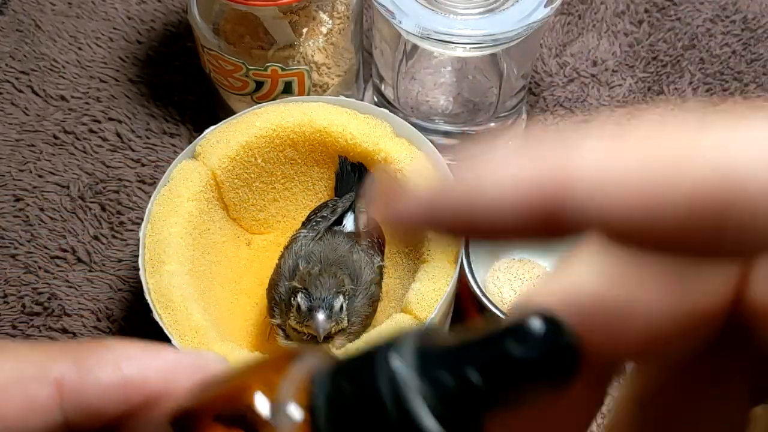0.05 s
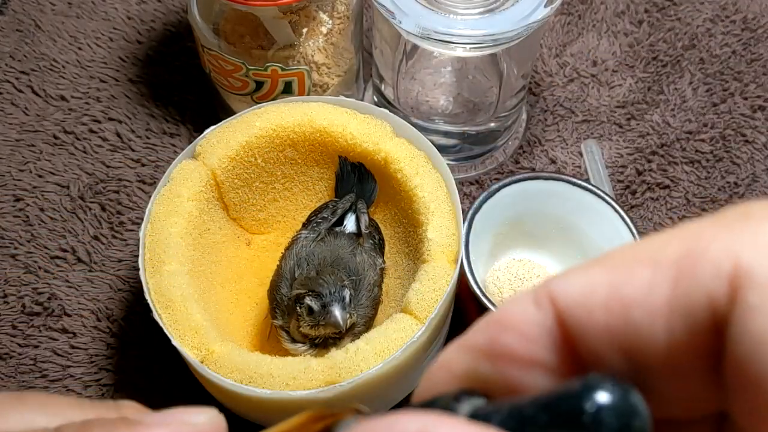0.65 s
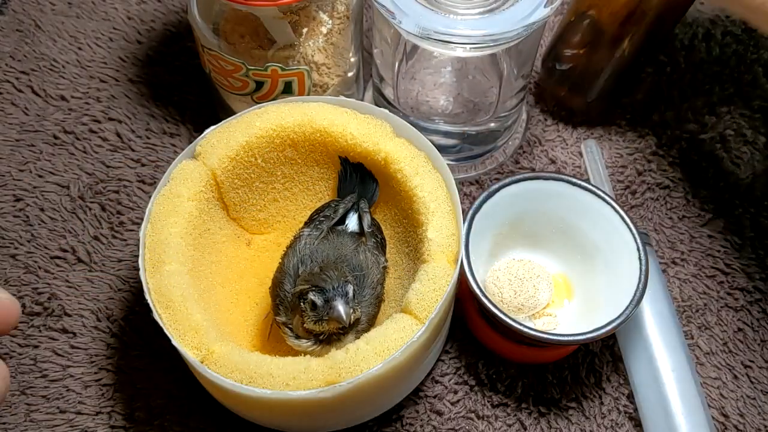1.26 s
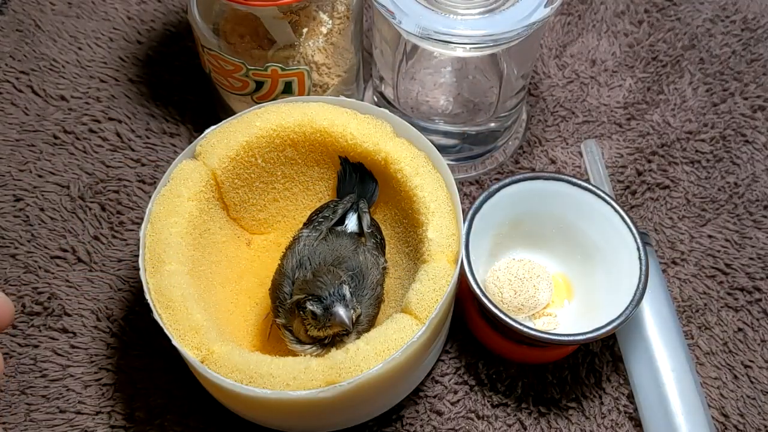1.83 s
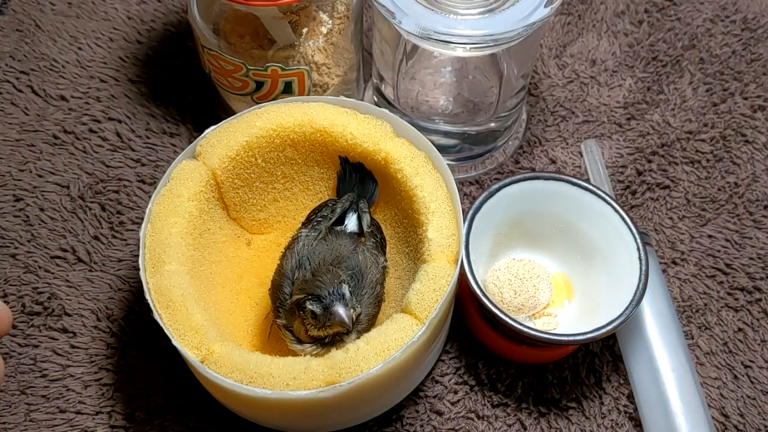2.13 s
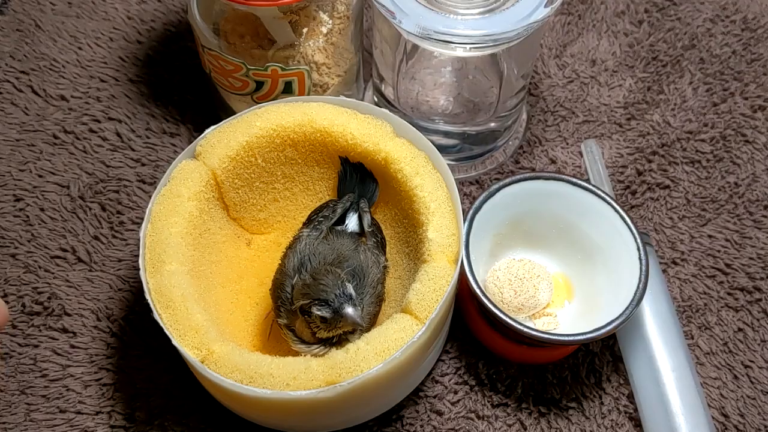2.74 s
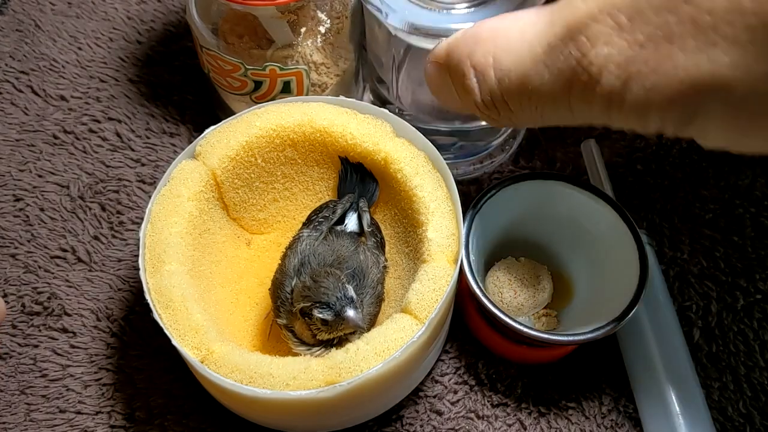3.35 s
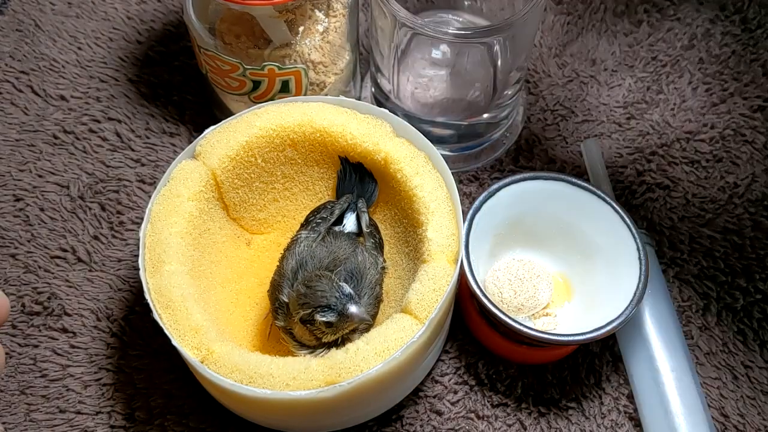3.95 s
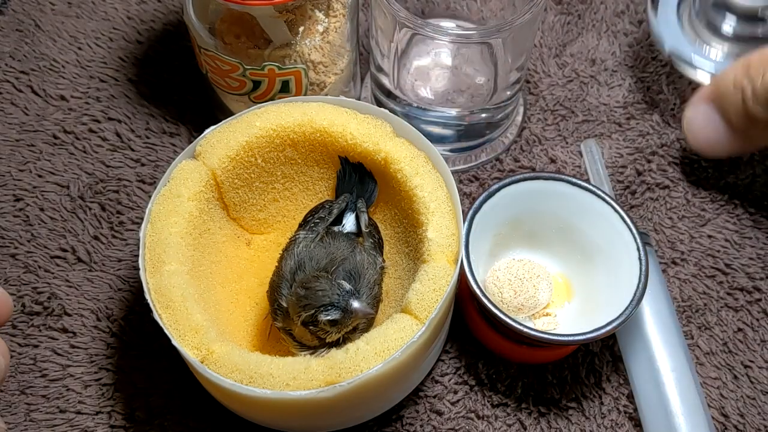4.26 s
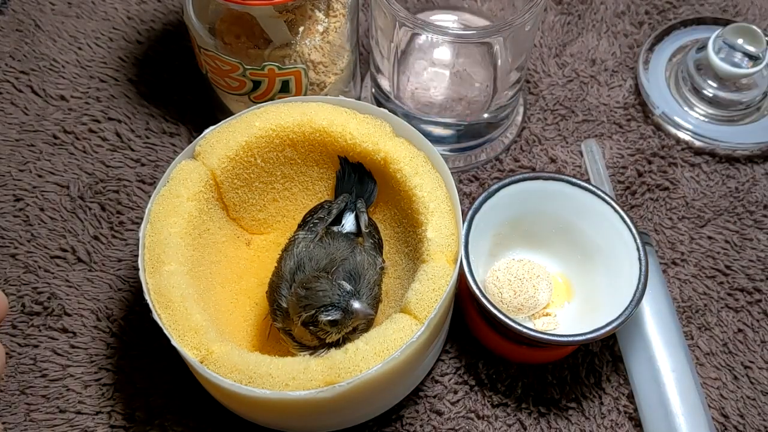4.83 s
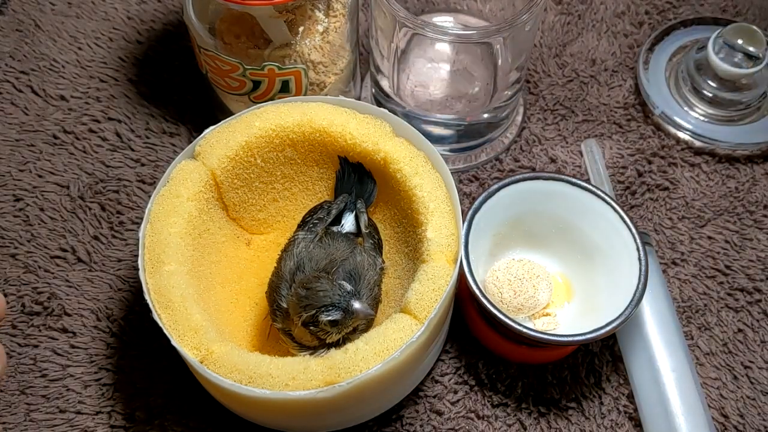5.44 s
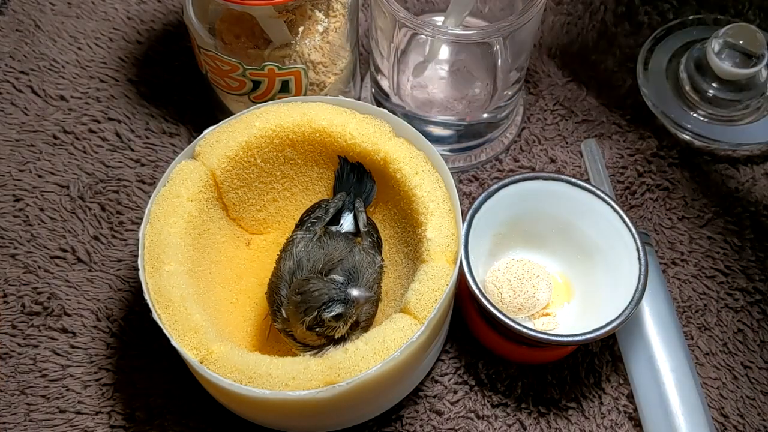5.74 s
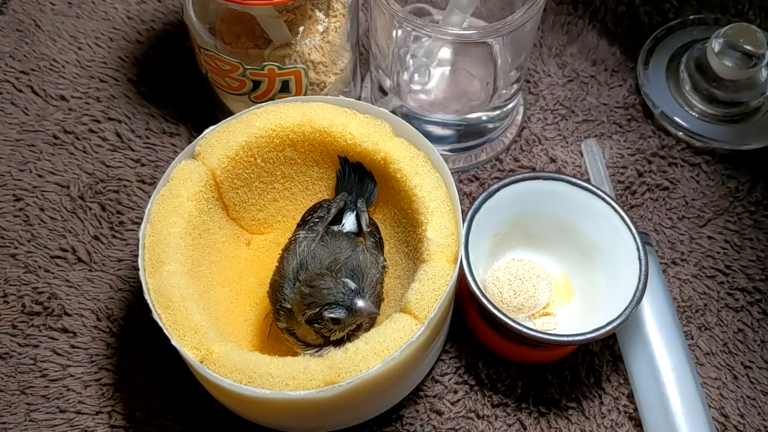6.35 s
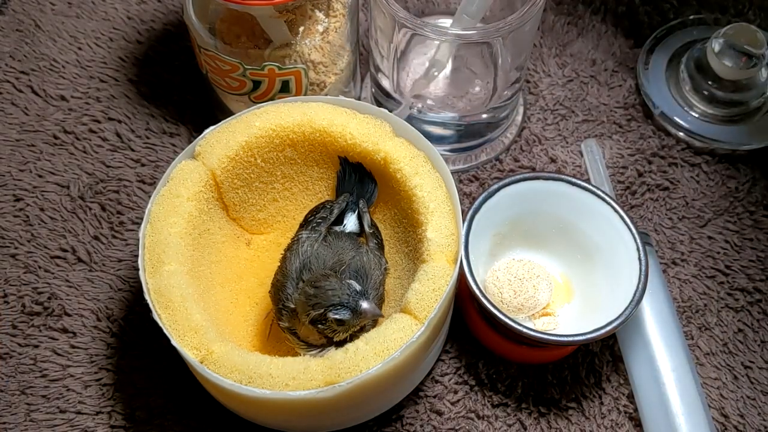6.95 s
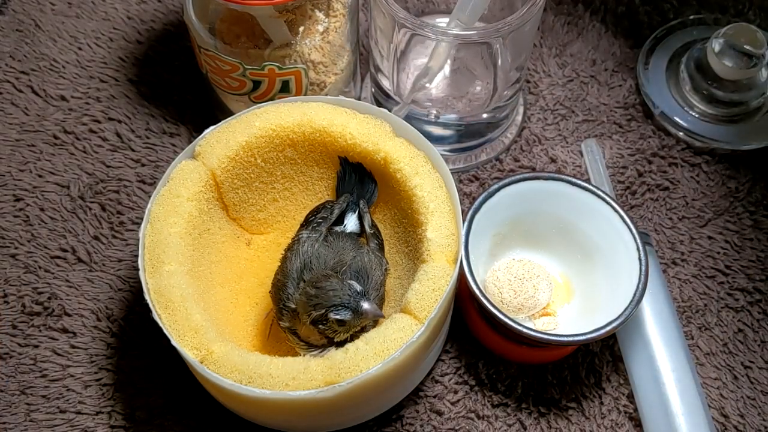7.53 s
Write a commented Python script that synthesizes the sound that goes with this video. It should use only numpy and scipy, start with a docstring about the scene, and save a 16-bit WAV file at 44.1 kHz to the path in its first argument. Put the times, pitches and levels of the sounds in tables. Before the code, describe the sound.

Two finches call almost without pause in a small room, a little left of the microphone, one closer than the other. Rapid trills and twittering overlap at first, then give way to louder, separate chirps that slide down in pitch. The walls blur the calls into a bright wash. A hand moving feeding things on a towel adds a few soft bumps and ticks over faint room noise.

```python
"""Two finches in a small room

Two finches chirp and trill without pause, a little left of the microphone. Each syllable is one
gliding whistle, repeated in phrases; the hard walls smear the fast glides into a bright wash.
A hand moves feeding things on a towel with a few soft bumps, over faint room noise."""
import sys
import numpy as np
from scipy import signal
from scipy.fft import rfft, irfft, next_fast_len
from scipy.io import wavfile
from scipy.ndimage import uniform_filter1d

SR = 44100
rng = np.random.default_rng(int(sys.argv[2]) if len(sys.argv) > 2 else 0)


def output_pcm(signal):
    """Save a mono or channel-first signal as 16-bit PCM at the path in sys.argv[1].

    Samples are clipped to [-1, 1] before scaling.
    """
    pcm = np.clip(np.atleast_2d(signal).T, -1, 1) * 32767
    wavfile.write(sys.argv[1], SR, np.round(pcm).astype(np.int16))


N = 334701


def undb(db):
    """Turn decibels into a factor to multiply a sound by."""
    return 10 ** (np.asarray(db) / 20)


def unit(x):
    """Scale a sound so that its average power is 1."""
    return x / np.sqrt(np.mean(x ** 2))


def pan(x, left_db):
    """Make the left channel louder than the right by left_db."""
    return x * undb(np.array([[1], [-1]]) * left_db / 2)


def add(track, sound, start_s):
    """Mix a sound into a track at a given time."""
    start = int(round(start_s * SR))
    lo, hi = max(start, 0), min(start + sound.shape[-1], N)
    if hi > lo:
        track[..., lo:hi] += sound[..., lo - start:hi - start]


def colour(x, gain):
    """Turn each frequency of a sound up or down by the factor gain(hz)."""
    size = next_fast_len(x.shape[-1])
    hz = np.maximum(np.arange(size // 2 + 1) * SR / size, 1)
    return irfft(rfft(x, size) * gain(hz), size)[..., :x.shape[-1]]


def wander(t, rate_hz):
    """A random wobble that slides to a new value rate_hz times a second."""
    targets = rng.standard_normal(size=512)
    return np.interp((t - t[0]) * rate_hz, np.arange(len(targets)), targets)


def room_noise(level_db=-53.5, apart_hz=750, left_db=4):
    """Faint steady noise whose bass is nearly the same on both sides."""
    # Tone of the noise: (frequency [Hz], relative level [dB])
    spectrum = [(20, -17), (45, 2), (100, -4.5), (200, -9.5), (300, -10), (450, -17.5), (850, -10),
                (1300, -18), (3000, -14), (8000, -38.5), (15000, -41)]
    points_hz, db = np.transpose(spectrum)
    noise = rng.standard_normal((2, N))
    shared, side = colour(noise, lambda hz: undb(np.interp(np.log(hz), np.log(points_hz), db)))
    side = colour(side, lambda hz: np.clip(hz / apart_hz, .12, .85))
    stereo = np.array([shared + side, shared - side])
    stereo = colour(stereo, lambda hz: pan(1, left_db) ** np.minimum(hz / apart_hz, 1))
    return undb(level_db) * unit(stereo)


def hand_bumps(attack_s=0.0016):
    """A hand knocks and brushes things on a towel: bursts of noise that die away quickly."""
    # Bumps and ticks: (time [s], relative level [dB], centre [Hz], width [Hz], fade time [s])
    bumps = [(2.078, -38.5, 178, 150, 0.02), (2.49, -45.5, 600, 1200, 0.061),
             (2.705, -45, 9700, 5000, 0.002), (2.755, -38, 8900, 5000, 0.0031),
             (2.809, -48, 430, 905, 0.067), (2.895, -51, 910, 600, 0.037),
             (4.455, -40.5, 780, 1200, 0.0083), (5.419, -50.5, 495, 287, 0.16),
             (5.763, -44.5, 325, 232, 0.058), (6.54, -51, 750, 915, 0.13), (6.68, -52, 460, 200, 0.041)]
    out = np.zeros((2, N))
    t = np.arange(SR // 2) / SR
    for start_s, db, centre_hz, width_hz, fade_s in bumps:
        noise = rng.standard_normal(len(t)) + 0.6 * rng.standard_normal((2, len(t)))
        body = colour(noise, lambda hz: 1 / (1 + ((hz - centre_hz ** 2 / hz) / width_hz) ** 2))
        loudness = undb(db - 1) * np.minimum(t / attack_s, 1) * np.exp(-t / fade_s)
        add(out, loudness * unit(body), start_s)
    return out


def room(x, direct_db, early_db, tail_db, left_db, early_s=0.057, build_s=0.011):
    """A bird's direct sound, then its echoes, which blur into a tail that loses its treble first."""
    # First echoes from table and walls: (delay [ms], strength [factor])
    echoes = [(2.4, 0.41), (5.6, 0.24), (9.8, 0.27), (13.2, 0.26), (15.6, 0.4), (18, 0.19), (28, .17),
              (42, .16), (69, .1)]
    # How long the room rings: (frequency [Hz], time to fade by 60 dB [s])
    ring_times = [(1000, 0.81), (2500, 0.44), (4000, 0.49), (7000, 0.52), (14000, 0.22)]
    t = np.arange(int(.7 * SR)) / SR
    centres_hz, fades_s = np.transpose(ring_times)
    late, early = rng.standard_normal((2, 2, len(t)))
    tail = np.zeros_like(late)
    for weights, fade_s in zip(np.eye(len(centres_hz)), fades_s):
        band = colour(late, lambda hz: np.interp(hz, centres_hz, weights))
        tail += band * undb(-60 * t / fade_s)
    onset = np.minimum(t / build_s, 1)
    scatter = early * np.exp(-(t / early_s) ** 2)
    response = undb(tail_db) * unit(tail * onset) + undb(early_db) * unit(scatter * onset)
    response /= np.sqrt(len(t))
    for delay_ms, strength in echoes:
        # each echo comes from its own side, so it reaches left and right at different moments
        arrivals = int(delay_ms * SR / 1000) + rng.integers(0, 14, 2)
        response[[0, 1], arrivals] += strength
    walls = signal.fftconvolve(x[None], response, axes=1)[:, :N]
    # the open beak aims its treble past the microphone, so high notes arrive mostly by the walls
    beam_hz, beam_db = 5200, -8
    direct = colour(x, lambda hz: undb(beam_db / (1 + (beam_hz / hz) ** 8)))
    return pan(undb(direct_db) * direct + walls, left_db)


def sizzle(voice, width_hz=600, follow_s=.006):
    """A thin, high hiss that follows the loudness of a voice and arches in pitch."""
    # Path of the hiss: (time [s], centre [Hz], relative level [dB])
    path = [(1.55, 9400, -45), (1.7, 9900, -22), (2.05, 10400, -20.5), (2.5, 10200, -21), (2.85, 9500, -20),
            (3.45, 9400, -18), (3.6, 9300, -45)]
    times, hz, db = np.transpose(path)
    t = np.arange(N) / SR
    loudness = np.sqrt(np.abs(uniform_filter1d(voice ** 2, size=int(follow_s * SR))))
    noise = unit(colour(rng.standard_normal(N), lambda f: 1 / (1 + (f / width_hz) ** 4)))
    # multiplying by a tone lifts the low noise up to that tone's pitch
    tone = np.sin(2 * np.pi * np.cumsum(np.interp(t, times, hz)) / SR)
    return loudness * undb(np.interp(t, times, db)) * noise * tone


def syllable(shape, pitch_ratio, db, beak_db, flutter=0.0059):
    """One gliding whistle from a bird's voice box; fast glides strain it and make it bright and raspy."""
    # Overtones at 2, 3, 4 and 5 times the pitch: (relative level [dB])
    overtone_levels = [-24, -27.5, -35, -43]
    # How throat and beak pass the overtones: (frequency [Hz], boost or cut [dB])
    throat = [(4000, -12), (7000, -19.5), (8600, -1), (9600, 1), (11300, 2.5), (13200, -2.5), (15500, 2.5)]
    fast_glide_per_s, hoarse_hz = 40, 4400
    strain_db, shimmer_db, edge_s = 6, 2.0, 0.00078
    times, hz, efforts_db = np.transpose(shape)
    t = np.arange(times[0], times[-1], 1 / SR)
    pitch = pitch_ratio * uniform_filter1d(np.interp(t, times, hz), size=100)
    effort_db = np.interp(t, times, efforts_db)
    glide_per_s = np.abs(np.gradient(np.log(pitch))) * SR
    strain = np.tanh(glide_per_s / fast_glide_per_s)

    # low notes flutter and buzz more, high notes are hoarser
    high = 1 / (1 + (hoarse_hz / pitch) ** 20)
    low = 1 - high
    wobble = flutter * (low + .35 * high) * wander(t, rate_hz=250)
    buzz = 18 * flutter * low * wander(t, rate_hz=800)
    rasp = 1.25 * (.35 + 3 * strain) * wander(t, rate_hz=920)
    loudness = undb(db + effort_db + shimmer_db * wander(t, rate_hz=197.7))
    hoarseness = 1.02 * strain * (high + .3 * low) * wander(t, rate_hz=1100)
    phase = 2 * np.pi * np.cumsum(pitch * (1 + wobble)) / SR + buzz
    tone = np.sin(phase + hoarseness)

    overtones = np.zeros(len(t))
    for multiple, overtone_db in enumerate(overtone_levels, 2):
        throat_db = np.interp(multiple * pitch, *np.transpose(throat))
        in_range = multiple * pitch < SR / 2
        overtones += undb(overtone_db + throat_db) * np.sin(multiple * phase + rasp) * in_range
    # an open beak, strain and effort all bring out the overtones
    brightness = undb(beak_db + strain_db * strain + .25 * effort_db)
    edges = np.minimum(np.minimum(t - times[0], times[-1] - t) / edge_s, 1)
    return loudness * edges * (tone + brightness * overtones)


def plain_whistle(length_s, start_hz, end_hz, change_db, edge_share=0.11, edge_db=-9):
    """The shape of a plain note: one even glide with a soft start and end."""
    along = np.array([0, edge_share, 1 - edge_share, 1])
    pitch = start_hz + (end_hz - start_hz) * along
    effort_db = change_db * along + edge_db * np.array([1, 0, 0, 1])
    return np.transpose([length_s * along, pitch, effort_db])


def phrase(repeats, first_s, last_s, slowing, opening_hz, opening_db, level_db, change_db):
    """Time, pitch shift and level of each repeat: the pace drifts, and the opening shifts wear off."""
    pitch_settle, level_settle = .3, 0.093  # as shares of the phrase
    along = np.linspace(0, 1, repeats)
    beats_s = first_s + (last_s - first_s) * along * (1 - slowing * (1 - along) / 2)
    shift_hz = opening_hz * np.exp(-along / pitch_settle)
    db = level_db + change_db * along + opening_db * np.exp(-along / level_settle)
    return zip(beats_s, shift_hz, db)


def finch_song(bird, pitch_spread=.1):
    """One bird's phrases and whistles; the more a syllable flutters, the more its repeats vary in pitch."""
    # Points along each named syllable: (time from its beat [s], pitch [Hz], effort [dB])
    shapes = { "slur": [(-.088, 7760, -9.5), (-.045, 6260, -11), (-.014, 5280, -9), (-.009, 5120, 1),
              (.02, 4140, -0.5), (.036, 3830, 4), (.064, 3735, 1), (.078, 3700, -18)],
              "rise": [(0, 3700, 1), (.015, 4200, -3), (.028, 4500, -2), (.036, 4170, -3)],
              "hook": [(0, 3260, 2.5), (.015, 3950, -6.5), (.028, 4230, -3.5), (.036, 3740, 3.5)],
              "twitter": [(-.002, 7250, -24), (0, 6850, -15), (.004, 5200, -15), (.007, 6500, -14),
              (.013, 5200, -19), (.016, 3700, -40), (.02, 3230, -11), (.028, 3310, -4.5), (.036, 3330, -4),
              (.045, 3200, -14)], "dip": [(0, 3720, -10), (.022, 3450, -10.5), (.028, 3200, 3),
              (.042, 2700, -5)], "slide": [(-.1, 7790, -23.5), (-.08, 7040, -25), (-.068, 6780, -58),
              (-.035, 5290, -36), (-.021, 5020, -22), (-.017, 4830, -6), (-.008, 4450, -11),
              (.01, 3950, -9), (.021, 3480, -13), (.028, 3200, -1.5), (.038, 2880, -7.5), (.05, 2520, -18)],
              "chip": [(-.006, 7590, -34), (0, 6720, -12), (.005, 5200, -4), (.009, 4320, -3)],
              "chirp": [(-.1, 7180, -25), (-.07, 7000, -25), (-.04, 6570, -18.5), (-.02, 5960, -16.5),
              (-.007, 5000, -6.5), (-.003, 4200, -2), (.003, 3680, -.5), (.012, 3350, -2.5),
              (.026, 3230, -6), (.04, 3260, -25)], "chew": [(-.096, 6820, -19.5), (-.08, 6660, -26),
              (-.068, 6417, -62), (-.056, 5700, -23), (-.023, 5100, -13), (-.009, 4150, -7),
              (-.002, 3550, -8), (.001, 3220, 4), (.007, 2980, -3.5), (.015, 2650, -1.5), (.021, 2280, -9),
              (.029, 2000, -22)], "sweep": [(-.1, 7080, -27), (-.066, 7030, -21.5), (-.028, 5900, -17),
              (0, 5000, -7), (.02, 4250, -2.5), (.037, 3680, -1.5), (.085, 3640, -3.5), (.115, 3530, -17)],
              "lilt": [(-.026, 5560, -4.5), (-.02, 4100, -7), (-.015, 2600, -26), (-.011, 1700, -19),
              (0, 2480, -5.5), (.01, 2840, -5), (.017, 2890, -1.5), (.022, 2860, -14)],
              "ripple": [(0, 2620, -11), (.012, 2940, -11), (.024, 3350, -5)], "purr": [(0, 2250, 5),
              (.005, 1660, 1), (.011, 1100, -4.5)], "roll": [(0, 2070, -20.5), (.006, 2547, -3.5),
              (.014, 3015, -2.5), (.018, 3400, -9), (.023, 4153, -7.5)], "rattle": [(-.004, 3396, -2),
              (.004, 2547, -1), (.013, 1946, -7), (.02, 1549, -17), (.028, 2200, -10.5), (.036, 2910, -11)],
              "tremolo": [(0, 1450, -12), (.004, 1620, 3), (.008, 1720, 0), (.012, 1830, -16)], }
    # Runs of one syllable: (bird, syllable, repeats, first beat [s], last beat [s], slowing [share],
    # opening pitch shift [Hz], opening level shift [dB], level [dB], level change over the run [dB],
    # pitch flutter [share], overtones let out by the beak [dB])
    phrases = [ ("far", "lilt", 16, -.016, .88, 0, 380, 5.5, -29.2, -.5, 0.013, 3),
               ("near", "slur", 2, .063, .297, 0, 80, 0, -28.3, -1, 0.005, 6),
               ("near", "slur", 2, .543, .782, 0, 110, 0, -27, -1, 0.005, 6),
               ("far", "ripple", 18, 1.04, 1.516, 0, 0, 0, -30, -1.44, 0.016, -4),
               ("far", "purr", 11, 1.17, 1.46, 0, 0, 0, -47.5, -2.6, .03, -4),
               ("near", "rise", 2, 1.57, 1.632, 0, -62, 0, -33.5, -2.3, 0.056, -1.8),
               ("far", "roll", 20, 1.615, 2.575, 0, 215, 0, -29.3, -3, 0.022, 2.8),
               ("near", "twitter", 22, 1.646, 2.822, 0, -45.5, -9.5, -24, -6.5, .004, -1),
               ("far", "hook", 3, 1.7, 1.82, 0, 0, 0, -40, -2, 0.029, 0),
               ("far", "rattle", 19, 2.594, 3.437, 0, 0, 0, -31.7, -1.7, 0.02, 6),
               ("near", "dip", 1, 2.856, 2.856, 0, 0, 0, -25, 0, 0.0096, 2),
               ("near", "slide", 7, 3.073, 4.283, -.115, 0, .5, -21.5, 0.44, .017, 4),
               ("near", "chip", 4, 3.757, 4.538, 0.11, 0, 0, -27.5, 0.87, 0.039, 1),
               ("near", "chirp", 6, 4.707, 5.533, .035, 370, -0.81, -18.4, 0, 0.005, -.5),
               ("near", "chew", 10, 5.7, 7.143, .05, -30, -1.6, -21, 0, .04, 1),
               ("far", "hook", 4, 5.73, 6.28, 0, -150, 0, -36.5, -4, 0.034, 0),
               ("far", "tremolo", 9, 6.141, 6.311, .05, 0, 0, -51, 4, 0.018, 0),
               ("far", "tremolo", 5, 6.406, 6.514, 0, 30, 0, -50, -3, 0.018, 0),
               ("near", "sweep", 2, 7.291, 7.519, 0, 0, 0, -20.5, 0.59, 0.0095, -.5), ]
    # Plain notes: (bird, time [s], length [s], start pitch [Hz], end pitch [Hz], level [dB],
    # level change [dB])
    whistles = [ ("near", 0.95, 0.13, 2925, 2865, -27.5, -2), ("near", 1.11, .08, 7800, 7350, -59, 0),
                ("near", 1.35, .08, 7850, 7400, -59, 0), ("far", 1.458, 0.05, 5810, 5830, -54, -4),
                ("far", 3.52, .185, 2410, 2285, -29.5, -5.5), ("far", 3.783, 0.149, 2140, 2250, -36, -5),
                ("far", 4.032, 0.158, 2165, 2260, -33.5, -8.5), ("far", 4.293, .16, 2165, 2260, -33.5, -7),
                ("far", 4.52, 0.11, 1770, 1790, -52, -11), ("near", 4.555, 0.07, 2990, 3110, -31.5, -5.5),
                ("far", 4.67, 0.132, 1770, 1795, -51, -4), ("far", 7.46, 0.07, 2380, 2480, -50, -9), ]
    out = np.zeros(N)
    for singer, name, *delivery, flutter, beak_db in phrases:
        if singer == bird:
            for beat_s, shift_hz, db in phrase(*delivery):
                shape = np.array(shapes[name]) + [0, shift_hz, 0]
                pitch_ratio = 1 + pitch_spread * flutter * rng.standard_normal()
                add(out, syllable(shape, pitch_ratio, db, beak_db, flutter), beat_s + shape[0, 0])
    for singer, start_s, length_s, start_hz, end_hz, db, change_db in whistles:
        if singer == bird:
            shape = plain_whistle(length_s, start_hz, end_hz, change_db)
            add(out, syllable(shape, pitch_ratio=1, db=db, beak_db=0.5), start_s)
    return out


def scene():
    """Two birds at different places in the same room, the hand and the room noise."""
    # Head turns, which change only the direct sound: (time [s], near bird [dB], far bird [dB])
    facing = [(0, -1, -5), (1.9, 4, -7), (2.6, 3, -7), (3.1, -2, -7), (4.4, -2.5, -7), (4.6, -6, -7),
              (5.8, -7, -7), (6.2, -8, 1), (7.5, -6, -3)]
    times, *levels_db = np.transpose(facing)
    near_db, far_db = (np.interp(np.arange(N) / SR, times, db) for db in levels_db)
    far_song = finch_song("far")
    near = room(finch_song("near"), near_db, early_db=-4.0, tail_db=-4.5, left_db=5.6)
    far = room(far_song + sizzle(far_song), far_db, early_db=-1.5, tail_db=-1.8, left_db=5.0)
    return near + far + pan(hand_bumps(), left_db=3.0) + room_noise()


def record(dry, dip_hz=7950, dip_width_hz=450, dip_db=-12, lean_hz=9800, lean_width_hz=1500, lean_db=-5):
    """The microphone has a narrow dip in the treble, leans right just above it, and cuts the very top."""
    heard = colour(dry, lambda hz: undb(dip_db * np.exp(-((hz - dip_hz) / dip_width_hz) ** 2)))
    heard = colour(heard, lambda hz: pan(1, lean_db * np.exp(-((hz - lean_hz) / lean_width_hz) ** 2)))
    top_cut = signal.ellip(10, .2, 80, 15600, fs=SR, output="sos")  # steep, above 15600 Hz
    return signal.sosfilt(top_cut, heard)


dry = scene()
out = record(dry)
output_pcm(out)
```